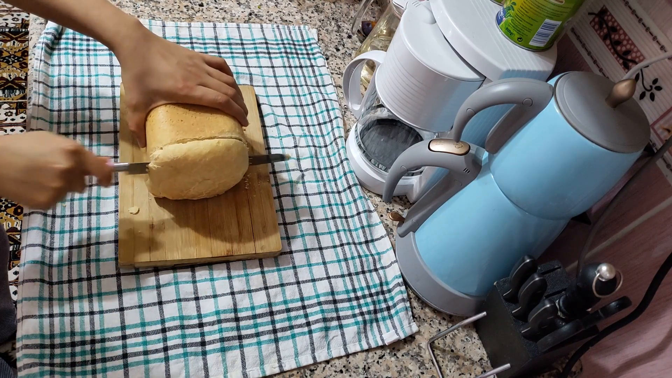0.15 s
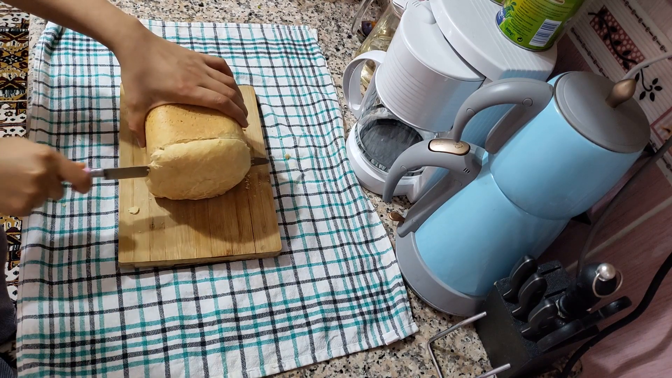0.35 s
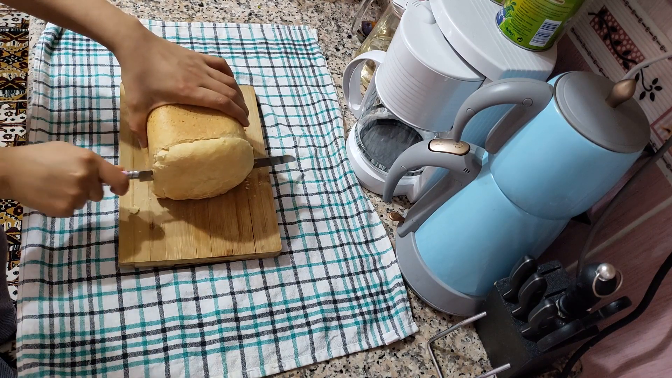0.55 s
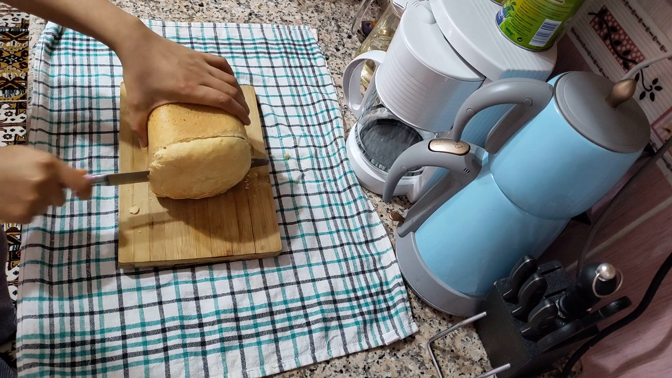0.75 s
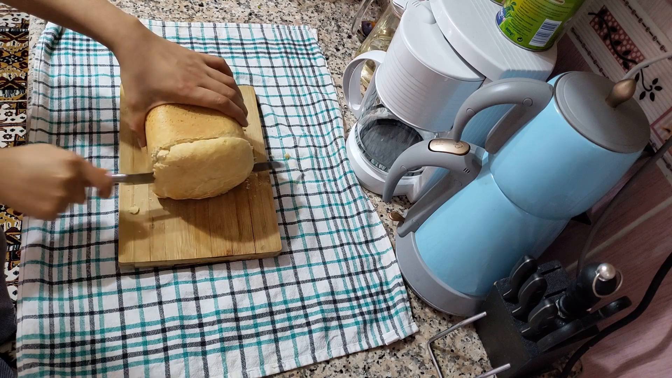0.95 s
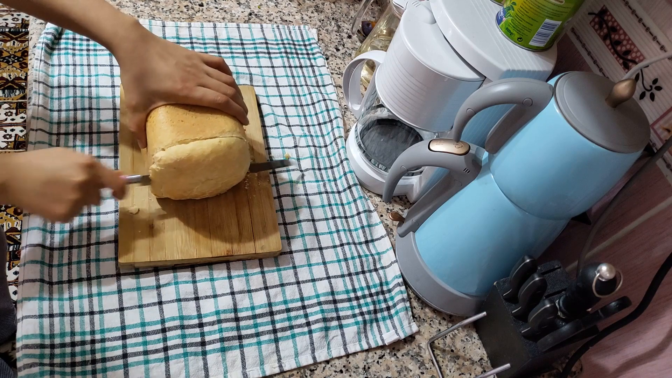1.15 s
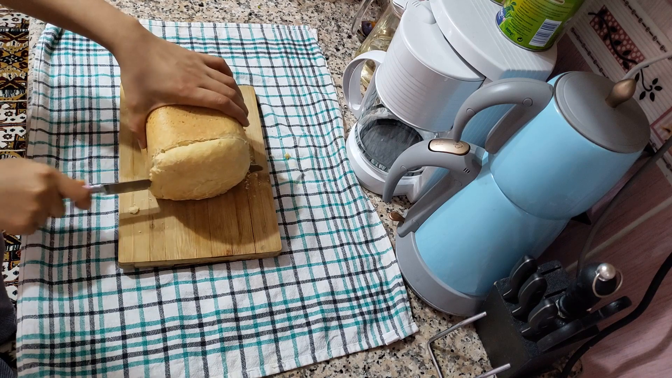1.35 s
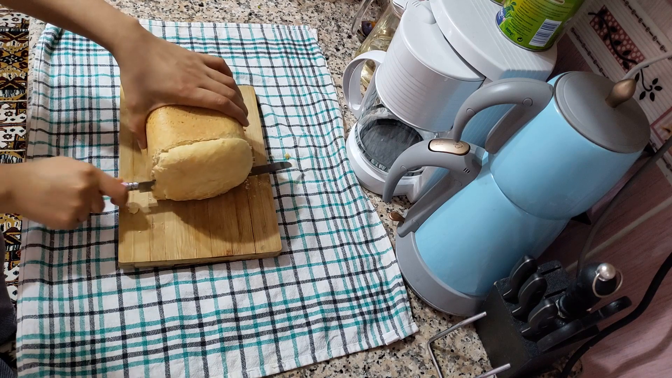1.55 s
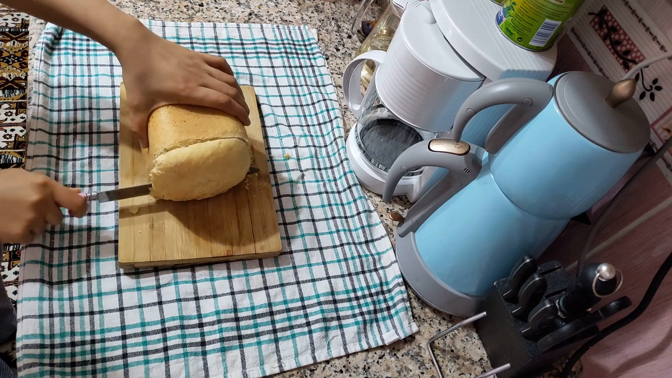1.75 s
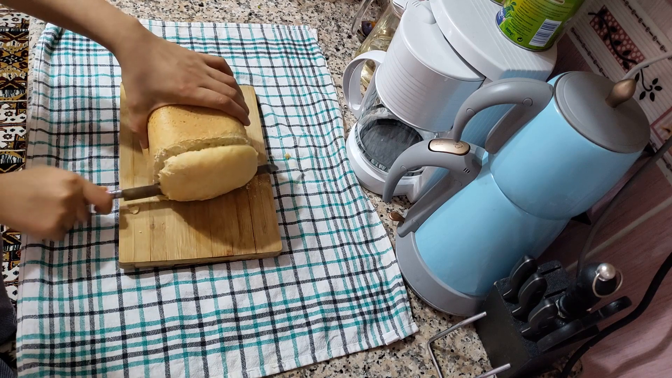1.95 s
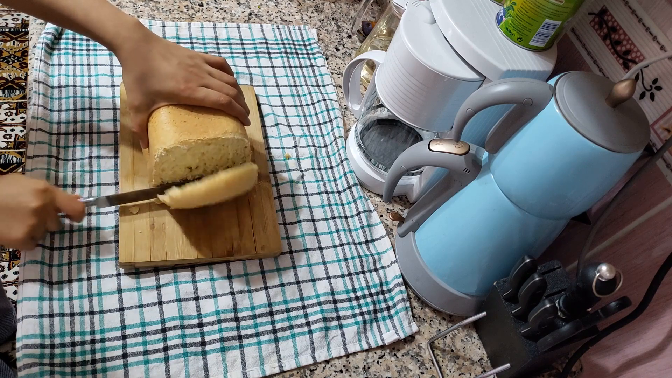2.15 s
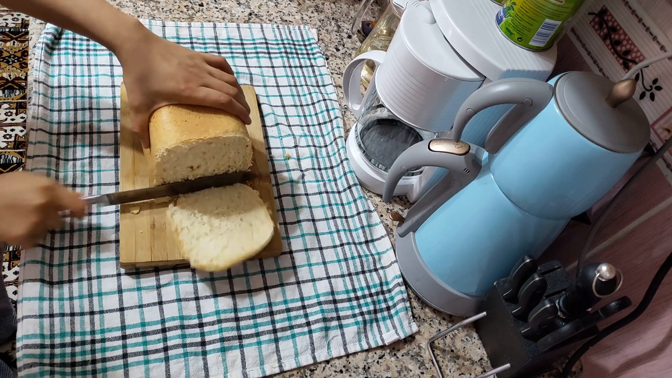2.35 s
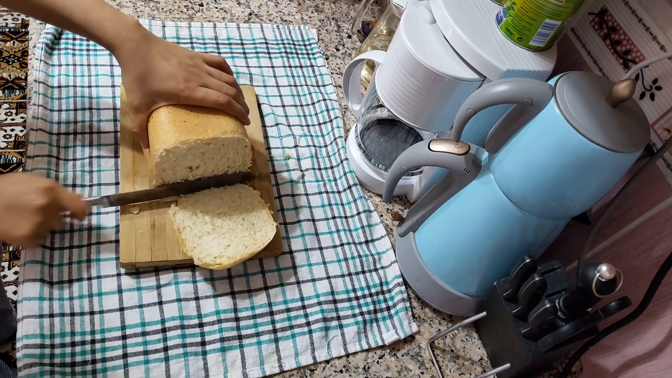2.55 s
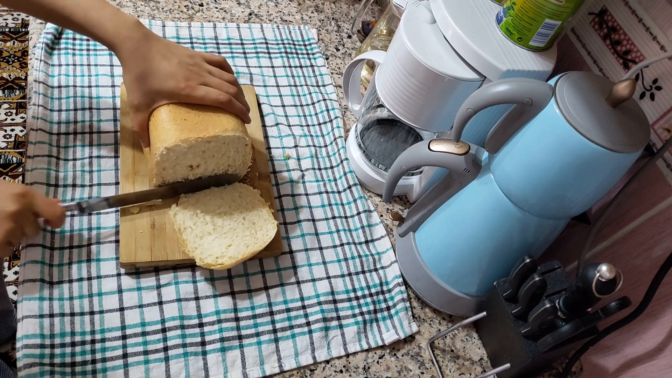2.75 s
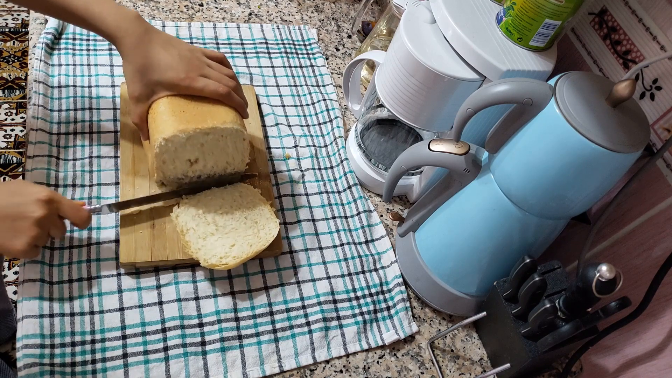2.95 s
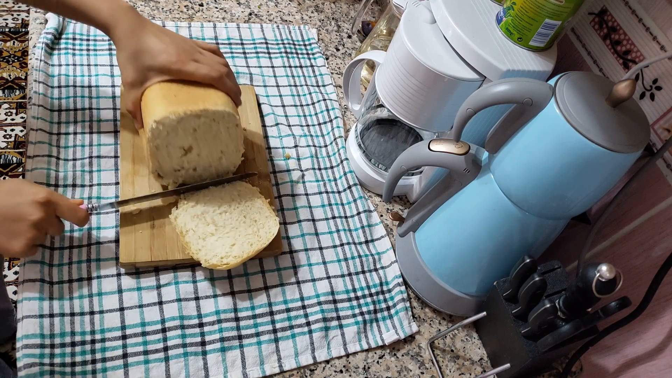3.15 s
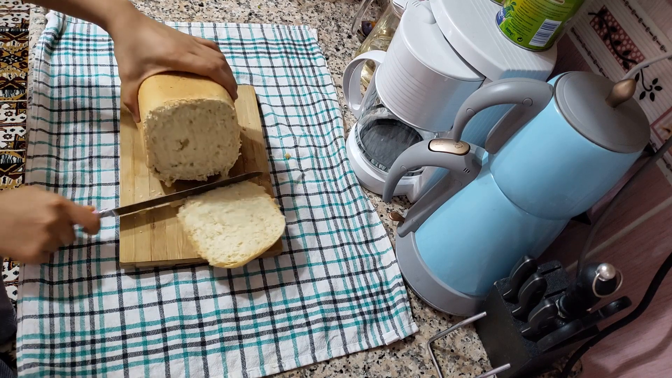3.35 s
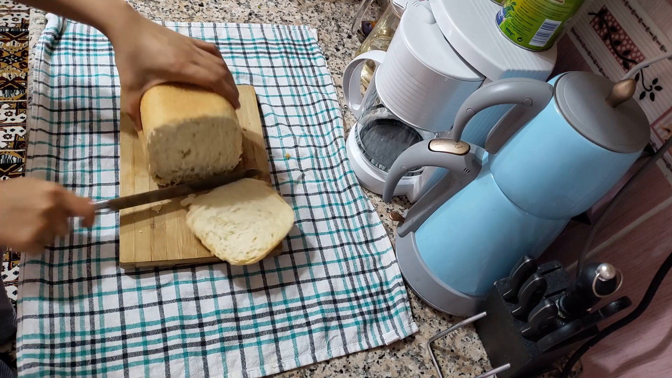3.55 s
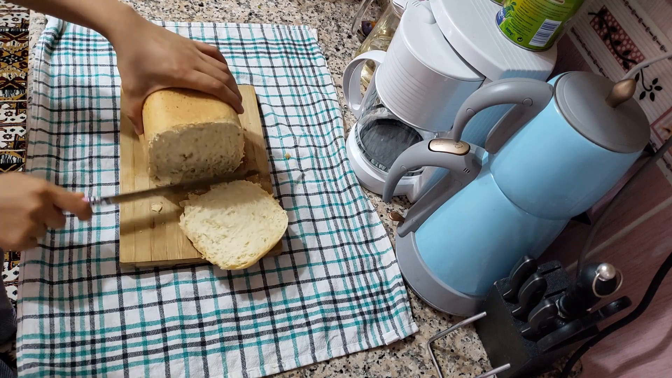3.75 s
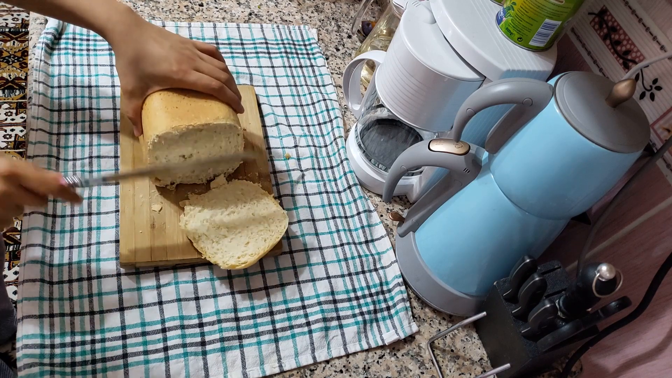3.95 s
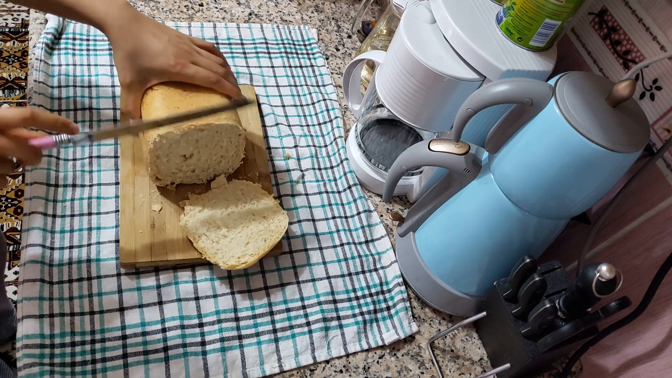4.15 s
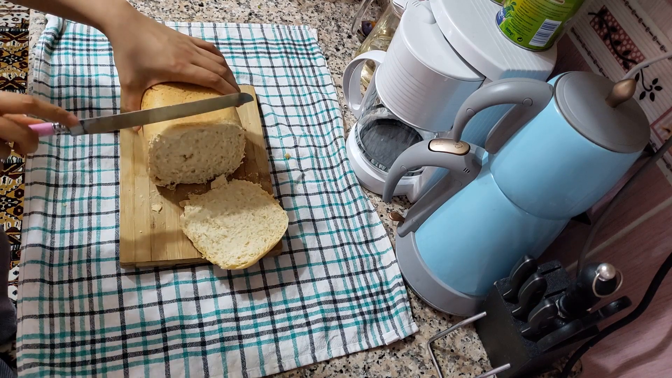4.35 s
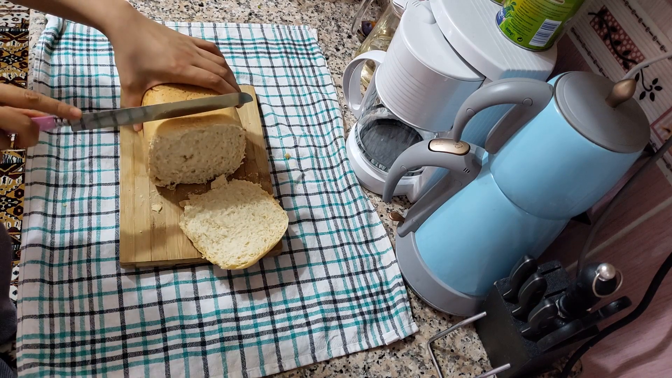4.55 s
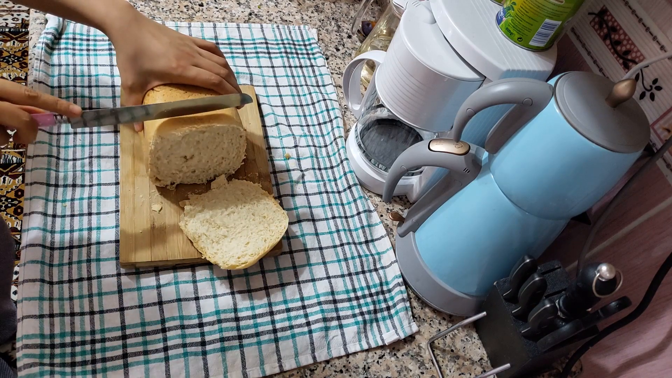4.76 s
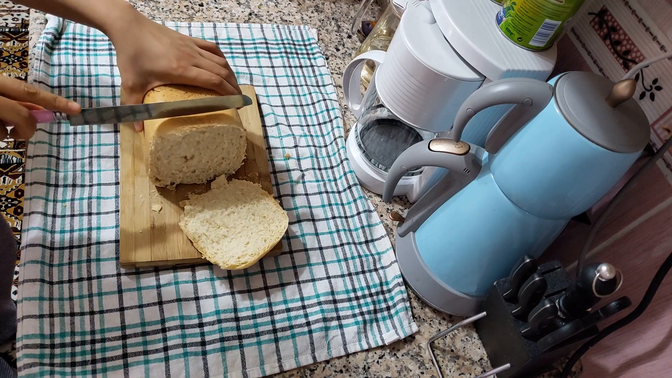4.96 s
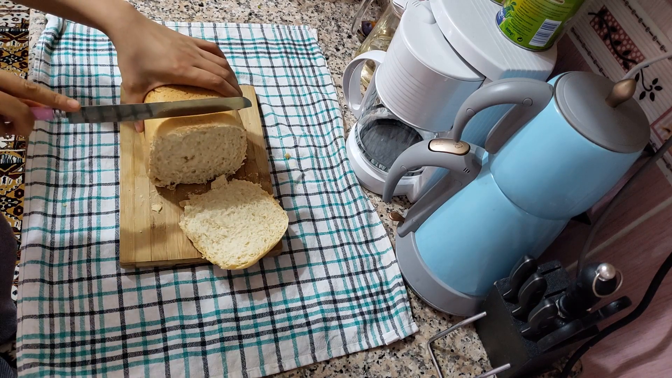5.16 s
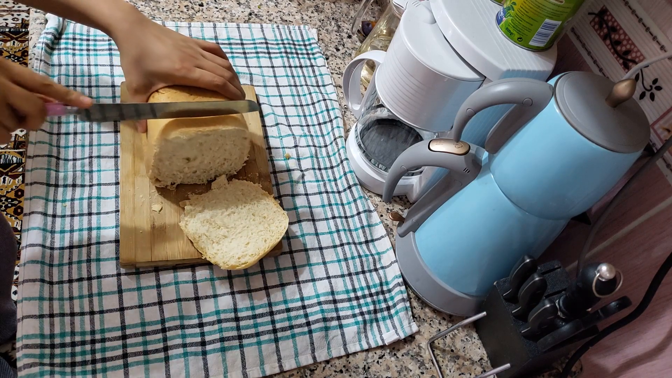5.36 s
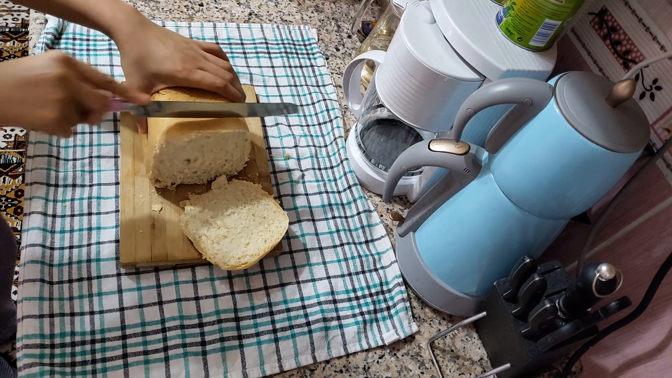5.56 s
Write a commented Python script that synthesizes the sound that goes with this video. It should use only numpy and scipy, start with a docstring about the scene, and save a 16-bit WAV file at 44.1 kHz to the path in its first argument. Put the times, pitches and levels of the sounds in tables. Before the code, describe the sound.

Close view of a bread knife sawing a crusty loaf on a wooden board in a small kitchen. Crunchy strokes alternate with weaker ones, then the teeth rasp loudly on the wood with small knocks as the slice falls. After a short gap the blade drags out along the crust, everything goes nearly silent over faint hiss, and a fresh loud crunch ends it.

```python
"""A serrated knife saws through a crusty loaf on a wooden board in a small kitchen.
Teeth crack the crust (clumped clicks through filters), shake the loaf and make the blade ring (decaying modes);
at the bottom they rasp on the board. The slice falls, and knife and slice bump the board (damped tones).
The knife is drawn out along the crust, rests, and bites into the top again. The counter booms softly
under the hands (low filtered noise), the room adds reflections, and a faint hiss lies behind."""
import sys
import numpy as np
from scipy import signal
from scipy.io import wavfile
from scipy.ndimage import uniform_filter1d

SR = 44100
rng = np.random.default_rng(int(sys.argv[2]) if len(sys.argv) > 2 else 0)


def dump(signal):
    """Clip the signal to [-1, 1] and save it as 16-bit WAV at the path in sys.argv[1]."""
    limited = np.clip(np.atleast_2d(signal).T, -1, 1)
    pcm = np.round(limited * 32767).astype(np.int16)
    wavfile.write(sys.argv[1], SR, pcm)


N = 247842
TIME = np.arange(N) / SR  # seconds

# Levels in the tables are relative: later gains shift them.

# Strokes of the knife. The one long hold is the blade dragging on the board under the last short strokes of the cut.
# Columns: full_bite_s, rise_s, hold_s, crunch_db (crust), fizz_db (finest flakes), rasp_db (board),
# shudder_db (loaf), boom_db (counter), ring_db (how firmly the blade is driven to ring)
STROKES = [ (0.0, .03, 0.049, -48.5, -55.5, -64, -46.5, -51, -3),
           (0.235, .15, .11, -79, -76.5, -100, -76, -62, -6),
           (0.355, 0.061, 0.013, -69.5, -65.5, -92, -59.5, -56, -12),
           (0.585, 0.049, 0.028, -57.5, -62, -75, -53.5, -54, -6),
           (0.83, .06, 0.021, -69, -72, -98, -67.5, -65, -6),
           (1.057, 0.037, 0.026, -43, -54, -59, -44, -45, 0.5),
           (1.365, 0.039, 0.018, -64, -62, -83, -65.5, -56, -1),
           (1.531, .028, 0.063, -46, -51, -53.5, -64, -44.5, -5.5),
           (1.736, .02, 0.026, -62.5, -64, -87, -67.5, -57, -5),
           (1.787, .06, 0.02, -54.5, -62, -72, -82, -58.5, -1),
           (1.95, .015, .02, -66, -67, -85, -84, -66, -2),
           (1.989, .045, .05, -49.5, -52, -44, -76.5, -52.5, -2.5),
           (2.161, 0.02, 0.013, -57, -60, -60.5, -78, -60, -1.5),
           (2.336, 0.037, 0.05, -54, -67, -52, -77, -42.5, 0.5),
           (2.468, 0.044, .04, -57, -56, -43.5, -62.5, -44.5, 0),
           (2.504, .03, .445, -54, -67, -45.5, -60.5, -48.5, 2),
           (2.523, 0.047, 0.028, -45, -54, -37.5, -52, -53, 0),
           (2.657, 0.13, 0.071, -46.5, -54, -39.5, -56, -51, 0),
           (2.814, 0.034, 0.063, -43.5, -53.5, -37.5, -64, -48, 1),
           (2.966, .07, 0.036, -51, -59, -44, -73, -52.5, 2.5),
           (3.437, 0.086, 0.044, -66, -68.5, -100, -97, -59.5, -6.5),
           (3.53, 0.083, 0.04, -44, -50.5, -64.5, -82, -56, -11.5),
           (3.66, 0.089, .06, -44, -52, -56, -53, -50.5, -10.5),
           (3.796, .04, 0.041, -60, -71.5, -100, -65.5, -54.5, -14),
           (5.457, 0.008, .028, -54, -58, -47, -84, -50.5, 2.5),
           (5.505, 0.038, 0.057, -40, -48.5, -39, -62.5, -54, 0.5),
           (5.574, .03, .035, -42, -50.5, -39, -51, -51, 0.5), ]
FULL_BITE_S, _, _, CRUNCH_DB, FIZZ_DB, RASP_DB, SHUDDER_DB, BOOM_DB, RING_DB = np.transpose(STROKES)


def sawing():
    """The teeth break the crust; the same jolts drive blade, board and loaf."""
    bite = teeth(per_s=100, unevenness=0.5, depth_db=8.5)
    crackle = fractures(per_s=2400, spread_db=3.5, bite=bite, rub=0.08)
    catches = snaps()
    firm_db = np.interp(TIME, FULL_BITE_S, RING_DB)
    crunch = crunching(crackle, catches, firm_db)
    rasp = rasping(bite)
    contact = crust(crunch, firm_db) + flakes(crackle, catches) + scrape(rasp)
    cutting = sliding(contact, depth_db=5, width_hz=100, hold_s=0.03)
    return cutting + blade(crunch, firm_db) + board(rasp, knocks()) + singing() + shudder(bite)


def teeth(per_s, unevenness, depth_db):
    """Teeth pass at an uneven pace, each biting with its own strength."""
    wander = evened(uniform_filter1d(rng.standard_normal(N), size=400))
    pace_per_s = per_s * np.exp(unevenness * wander)
    teeth_passed = np.cumsum(pace_per_s) / SR
    strength = rng.uniform(0.3, 1, N)[teeth_passed.astype(int)]
    return gain_of(depth_db * strength * np.sin(np.pi * teeth_passed) ** 2)


def fractures(per_s, spread_db, bite, rub):
    """Tiny breaks of very unequal size, clumped by the bite of the teeth, over a smooth rub."""
    sizes = gain_of(spread_db * np.minimum(rng.exponential(1, N), 4))
    breaks_now = rng.random(N) < per_s / SR
    clicks = sizes * rng.choice([-1, 1], N) * breaks_now
    grain = evened(clicks) + rub * rng.standard_normal(N)
    return steadied(bite * grain, seconds=0.055)


# Flakes of crust that catch on a tooth and break free. Columns: start_s, level_db
SNAPS = [(0.581, -47), (0.746, -57.5), (1.0146, -63), (1.04, -46), (1.058, -46), (1.355, -57),
         (1.5223, -35.5), (1.7284, -44.5), (1.9849, -34.5), (2.1599, -38), (2.4692, -39), (2.812, -38.5),
         (5.456, -39.5), (5.4924, -34)]


def snaps():
    """A sharp break, then a few milliseconds of crumbling."""
    out, t = np.zeros(N), TIME[:SR // 25]
    grits = rng.standard_normal((len(SNAPS), len(t)))
    for (start_s, level_db), grit in zip(SNAPS, grits):
        crumbling = grit * np.exp(-t / 0.015)
        add(out, start_s, gain_of(level_db - 12.5) * crumbling)
    return out


# How the crunch follows a stroke: lag_s, steepness (of the swell), release_db_per_s,
# sliding_db (level while the blade only slides in the loaf)
CRUNCH_LAW = (0.0, 1.0, 219, -86)


def crunching(crackle, catches, firm_db):
    """The crunch is shared between the open crackle of the crust and the ring of the gripped blade."""
    # a firmly driven blade takes more of the crackle
    crackle_share = 1 / np.hypot(1, gain_of(firm_db))
    crackling = crackle * gain_of(stroked(CRUNCH_DB, CRUNCH_LAW)) * crackle_share
    return crackling + gain_of(-2.5) * catches


# Colour of the cracking crust. Columns: pitch_hz, level_db (per Hz)
CRUST = [(500, -50), (850, -6), (1050, -3.5), (1300, -4), (1800, 4), (2500, 3), (3300, 0.5), (4400, 2),
         (6600, -7), (7700, -21), (14000, -25.5)]


def crust(crunch, firm_db):
    """Breaking crust gives the crunch its colour, thinner in the lows when the contact is light."""
    return gain_of(1.0) * thinned(through(crunch, colour(CRUST)), firm_db)


def thinned(x, firm_db):
    """Weakens the lower part of the crunch where the flat of the blade only slides past."""
    lowpass = signal.butter(4, 1330, fs=SR, output="sos")  # cutoff in Hz
    lows = signal.sosfiltfilt(lowpass, x)
    return x - (1 - gain_of(np.minimum(firm_db, 0))) * lows


# Modes of the steel blade held in the loaf. Columns: pitch_hz, level_db, t60_s (time to fall by 60 dB)
BLADE_MODES = [(684, -24, 0.12), (910, -18.5, 0.12), (1340, -40.5, 0.18), (1569, -1, 0.18),
               (1858, 1, 0.035), (1879, 3, .06), (2225, -7, 0.16), (3025, 1.5, 0.075), (3060, 2, 0.17),
               (3580, -2.5, 0.017), (3806, 1, 0.044), (4396, -9.5, 0.044), (5800, -9, 0.02),
               (8950, 1, 0.063), (9720, -2, 0.05), (12800, -5, 0.046)]


def blade(crunch, firm_db):
    """The crunch strikes the steel, whose modes ring and die away."""
    return gain_of(-0.5) * through(crunch * gain_of(firm_db), ringing(BLADE_MODES))


# Colour of the finest flakes. Columns: pitch_hz, level_db (per Hz)
FLAKES = [(2000, -54.5), (5500, -14), (7900, -7.5), (8600, -4), (9100, 1.5), (11000, -1), (14300, -12.5)]
# How their fizz follows a stroke: lag_s, steepness, release_db_per_s, sliding_db
FIZZ_LAW = (0, 1.0, 240.5, -87)
# The teeth brush the top of the loaf before the next cut. Columns: start_s (fullest moment), fizz_db
BRUSHES = [(4.915, -78.5), (5.249, -73), (5.392, -75)]


def flakes(crackle, catches):
    """The finest flakes fizz with each stroke, each catch and each brush of the teeth."""
    brushes_db = [db + swell(s, rise_s=0.0094, hold_s=0, release_db_per_s=110) for s, db in BRUSHES]
    fizz_db = np.max([stroked(FIZZ_DB, FIZZ_LAW), *brushes_db], axis=0)
    fizz = gain_of(1.45) * crackle * gain_of(fizz_db)
    return through(fizz + gain_of(-1) * catches, colour(FLAKES))


# How the rasp follows a stroke: lag_s, steepness, release_db_per_s, sliding_db
RASP_LAW = (0.0035, 1.36, 270, -102)


def rasping(bite):
    """Harder contact: the teeth jolt against the wooden board."""
    grain = fractures(per_s=1500, spread_db=2.5, bite=bite, rub=0.13)
    return grain * gain_of(stroked(RASP_DB, RASP_LAW))


# Colour of the scrape on the board. Columns: pitch_hz, level_db (per Hz)
BOARD = [(250, -40), (430, -14.5), (560, -7), (680, -5.5), (830, -2.5), (950, -14.5), (1080, 3.5),
         (1320, -2.5), (1550, -3), (1880, -9), (2250, -7), (3200, -11), (4300, -20), (6000, -44.5)]


def scrape(rasp):
    """The rasp is coloured by the board."""
    return gain_of(1) * through(rasp, colour(BOARD))


# Modes of the wooden board. Columns: pitch_hz, level_db, t60_s
BOARD_MODES = [(547, -19, 0.361), (566.3, -1.5, 0.16), (619, -17, 0.24), (700, -17.5, 0.053),
               (834, -4.5, 0.17), (1050, 6, 0.14), (1109, 3, 0.1), (1327, -4, 0.067), (1344, 8, 0.22),
               (1658, -4.5, 0.14), (1889, 8.5, 0.2), (3060, -2.5, .2)]


def board(rasp, blows):
    """Rasp and blows set the board's modes ringing; the blows are also heard directly."""
    push = gain_of(-6) * rasp + gain_of(-10) * blows
    return through(push, ringing(BOARD_MODES)) + gain_of(-8) * blows


# The slice and the blade bump the board. Columns: start_s, level_db, pitch_hz
KNOCKS = [(2.523, -35, 1266), (2.541, -29, 590), (2.553, -28, 598), (2.556, -31.5, 1045),
          (2.710, -32, 1190), (2.826, -26, 1200), (2.861, -27.5, 1232), (5.507, -29, 833),
          (5.537, -28, 613), (5.562, -37, 356), (5.588, -34, 512)]


def knocks():
    """Short, strongly damped blows on the wood."""
    out, t = np.zeros(N), TIME[:SR // 25]
    for start_s, level_db, pitch_hz in KNOCKS:
        age = pitch_hz * t / 1.9  # 1 at the peak of the blow
        shape = age * np.exp(1 - age)
        add(out, start_s, gain_of(level_db) * np.sin(2 * np.pi * pitch_hz * t) * shape)
    return out


# Friction makes the sliding blade sing for a moment. Columns: start_s, length_s, pitch_hz, width_hz, level_db
SINGS = [(0.169, 0.15, 3065, 27, -70.5), (0.299, 0.16, 2973, 20, -73), (0.564, 0.14, 2960, 26, -71.5),
         (0.565, 0.071, 1830, 83, -64.5), (0.57, 0.075, 4360, 170, -60), (0.725, 0.15, 2980, 24, -80),
         (0.81, 0.049, 2170, 51, -75), (1.035, 0.12, 819, 100, -52.5), (1.04, 0.16, 1602, 170, -53.5),
         (1.327, .14, 2990, 25, -71), (1.345, 0.098, 2240, 35, -70), (1.553, 0.095, 676, 76, -58),
         (1.709, .16, 3030, 42, -60.5), (1.781, .06, 1628, 113, -62), (1.93, 0.097, 2974, 33, -64),
         (1.988, 0.097, 1812, 150, -46), (3.378, 0.18, 4330, 120, -68), (3.73, 0.088, 1743, 70, -67),
         (3.778, 0.11, 4350, 140, -61)]


def singing():
    """Friction feeds one mode for a moment: a narrow, unsteady tone."""
    out = np.zeros(N)
    all_slips = rng.standard_normal((len(SINGS), SR // 2))
    for (start_s, length_s, pitch_hz, width_hz, level_db), slips in zip(SINGS, all_slips):
        t = TIME[:int(length_s * SR)]
        # irregular slips jog the phase, which widens the tone
        jogs = np.cumsum(uniform_filter1d(slips, size=40))[:len(t)]
        drift = jogs * np.sqrt(2 * np.pi * width_hz / SR)
        shake = gain_of(2 * evened(uniform_filter1d(slips, size=250)))[-len(t):]
        fade = signal.windows.tukey(len(t), 0.5)
        tone = np.sin(2 * np.pi * pitch_hz * t + drift)
        add(out, start_s, gain_of(level_db) * fade * shake * tone)
    return out


# Colour of the shaking loaf. Columns: pitch_hz, level_db (per Hz)
LOAF = [(70, -8.5), (130, -2.5), (230, 7), (320, 3.5), (400, -17), (500, -26), (650, -35), (840, -15),
        (1060, -58), (1450, -11), (2200, -34.5)]
# How the shudder follows a stroke: lag_s, steepness, release_db_per_s, sliding_db
SHUDDER_LAW = (0, 1.4, 290, -82)


def shudder(bite):
    """The soft loaf follows only the slow part of the jolts."""
    jolts = fractures(per_s=400, spread_db=2, bite=bite, rub=0.14)
    shaking = steadied(through(jolts, colour(LOAF)), seconds=0.039)
    return gain_of(4.0 + stroked(SHUDDER_DB, SHUDDER_LAW)) * shaking


def sliding(x, depth_db, width_hz, hold_s):
    """Resonances come and go as the point of contact slides along the blade."""
    hz, frame_s, z = signal.stft(x, SR, nperseg=512, noverlap=384)
    # random patches, smooth across pitch and along time
    across = np.exp(-0.5 * ((hz[:41] - hz[20]) / width_hz) ** 2)
    along = np.exp(-0.5 * ((frame_s[:121] - frame_s[60]) / hold_s) ** 2)
    field = evened(signal.fftconvolve(rng.standard_normal(z.shape), np.outer(across, along), "same"))
    patches = gain_of(depth_db * np.tanh(field))
    return signal.istft(z * evened(patches), SR, nperseg=512, noverlap=384)[1][:N]


def stroked(levels_db, law):
    """Level in dB of one part as it follows the strokes, with a light rub between them."""
    lag_s, steepness, release_db_per_s, sliding_db = law
    # at 3.1 s the slice is off and the blade comes free
    level_db = sliding_db - release_db_per_s * np.maximum(TIME - 3.1, 0)
    for (bite_s, rise_s, hold_s, *_), db in zip(STROKES, levels_db):
        stroke_db = db + swell(bite_s + lag_s, rise_s / steepness, hold_s, release_db_per_s)
        level_db = np.maximum(level_db, stroke_db)
    return level_db


def swell(s, rise_s, hold_s, release_db_per_s):
    """Level in dB of one movement: it swells up to time s, is held, then dies away."""
    age = TIME - s
    rising = 30.5 * np.minimum(age, 0) / max(rise_s, 1 / SR)  # climbs 30.5 dB in rise_s
    sagging = 19 * np.maximum(age, 0)  # slackens by 19 dB per s; the release adds to this
    return rising - sagging - abs(release_db_per_s) * np.maximum(age - hold_s, 0)


# Colour of the booming counter. Columns: pitch_hz, level_db (per Hz)
COUNTER = [(20, -40.5), (35, -31.5), (48, -15), (68, -11.5), (84, -11), (96, 4), (112, -10), (140, -17.5),
           (180, -19.5), (196, -3.5), (215, -26), (300, -46), (600, -64)]
# How the boom follows a stroke: lag_s, steepness, release_db_per_s, sliding_db
BOOM_LAW = (0.02, 0.4, 125, -64)
# The hands shift their grip and nudge the counter. Columns: start_s (fullest moment), boom_db
NUDGES = [(0.125, -49.5), (0.24, -53), (1.115, -46.5), (1.271, -57.5), (1.42, -54), (1.68, -54),
          (2.095, -48.5), (2.22, -53), (2.9, -47), (3.04, -50.5), (3.16, -57), (3.28, -60.5), (3.96, -58.5),
          (4.12, -67), (4.36, -65), (4.51, -63.5), (4.66, -67), (4.94, -66.5), (5.08, -63), (5.2, -64),
          (5.33, -68)]


def counter():
    """The worktop booms at its lowest modes with each stroke and each shift of the hands."""
    resting_db = -79.5
    push_db = np.maximum(stroked(BOOM_DB, BOOM_LAW), resting_db)
    for s, db in NUDGES:
        nudge_db = db + swell(s, rise_s=0.098, hold_s=0.022, release_db_per_s=93)
        push_db = np.maximum(push_db, nudge_db)
    boom = steadied(through(rng.standard_normal(N), colour(COUNTER)), seconds=0.15)
    return gain_of(push_db + 0.5) * boom


# How long the kitchen rings on. Columns: pitch_hz, t60_s
KITCHEN = [(150, 0.41), (500, 0.16), (1500, 0.29), (4000, 0.5), (9000, 0.91), (14000, 0.47)]


def kitchen(x, near_db, tail_db):
    """Quick reflections from worktop and appliances, then the tail of the hard-walled room."""
    t = TIME[:SR * 3 // 4]
    taps = rng.choice([-1., 1.], len(t)) * (rng.random(len(t)) < 3000 / SR)  # about 3000 per s
    near = taps * np.exp(-t / 0.02) * (t > 0.003)
    # each pitch dies away at its own rate
    hz, frame_s, z = signal.stft(taps * (t > 0.025), SR, nperseg=256)
    decay = gain_of(-60 * frame_s / read(KITCHEN, hz)[:, None])
    tail = signal.istft(z * decay, SR, nperseg=256)[1]
    return gain_of(-2.5) * x + gain_of(near_db) * through(x, near) + gain_of(tail_db) * through(x, tail)


# Colour of the hiss. Columns: pitch_hz, level_db (per Hz)
HISS = [(60, -27.5), (250, 5), (700, 0.5), (1400, -4), (2800, -8.5), (5600, -11.5), (10000, -19),
        (14000, -16.5)]
# The hiss dips briefly. Columns: start_s, level_db (change)
HISS_DIPS = [(4.05, 0), (4.3, -3), (4.36, 0), (4.82, -1), (4.86, -8), (4.9, 0)]


def hiss():
    """Faint background of filtered noise, even but for brief dips."""
    dip_db = np.interp(TIME, *np.transpose(HISS_DIPS))
    return gain_of(-81 + dip_db) * through(rng.standard_normal(N), colour(HISS))


def gain_of(db):
    """Decibels to amplitude."""
    return 10 ** (np.asarray(db) / 20)


def evened(x):
    """Scales to an rms (average strength) of 1."""
    return x / np.sqrt(np.mean(x ** 2) + 1e-20)


def steadied(x, seconds):
    """Holds the power at 1 over spans longer than the given time, keeping the finer grain."""
    window = np.hanning(int(seconds * SR) + 3)
    power = signal.fftconvolve(x ** 2, window / window.sum(), "same")
    return x / np.sqrt(abs(power) + 1e-9)


def read(points, hz):
    """Reads a table on a logarithmic frequency axis."""
    f, value = np.transpose(points)
    return np.interp(np.log(hz + 1), np.log(f + 1), value)


def colour(spectrum, size=8192):
    """Impulse response with the given spectrum, sounding only after the impulse."""
    hz = abs(np.fft.fftfreq(size, 1 / SR))
    log_gain = np.log(gain_of(read(spectrum, hz)))
    # the Hilbert transform finds the phase that puts the energy as early as possible
    response = np.fft.ifft(np.exp(np.conj(signal.hilbert(log_gain)))).real
    return response[:size // 2]


def ringing(modes):
    """Impulse response of decaying modes; the dB give each mode's energy."""
    t = TIME[:SR // 2]
    response = np.zeros(len(t))
    for hz, db, t60 in modes:
        response += gain_of(db - 60 * t / t60) / np.sqrt(t60) * np.sin(2 * np.pi * hz * t)
    return response


def through(x, response):
    """Passes x through an impulse response scaled to unit energy."""
    return signal.fftconvolve(x, response / np.linalg.norm(response))[:N]


def add(mix, s, sound):
    """Mixes a sound in at time s."""
    part = mix[round(s * SR):][:len(sound)]
    part += sound[:len(part)]


def scene():
    """Knife and loaf in the room, over the boom of the counter and the hiss."""
    cutting = kitchen(sawing(), near_db=-8.0, tail_db=-21.5)
    return (cutting + counter() + hiss())[None]


def record(dry):
    """Limits the band: a steep filter removes what lies above about 14400 Hz."""
    lowpass = signal.firwin(511, 14400, window=("kaiser", 9), fs=SR)
    return signal.oaconvolve(dry, lowpass[None], "same")


dry = scene()
out = record(dry)
dump(out)
```